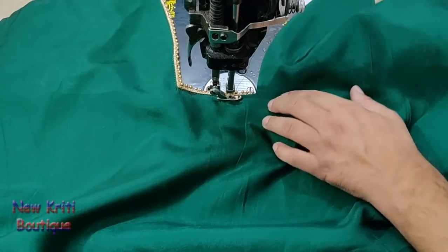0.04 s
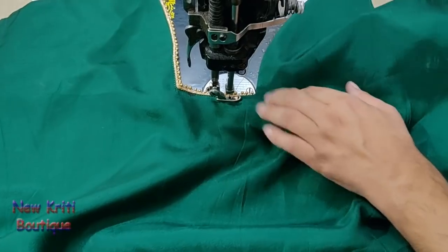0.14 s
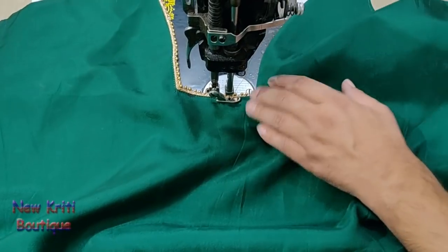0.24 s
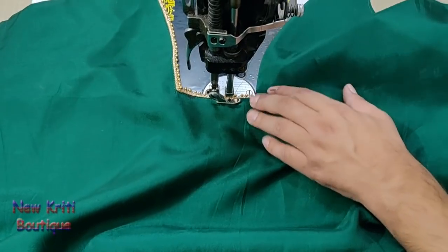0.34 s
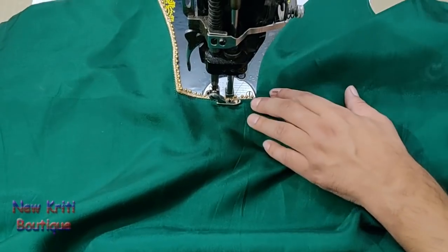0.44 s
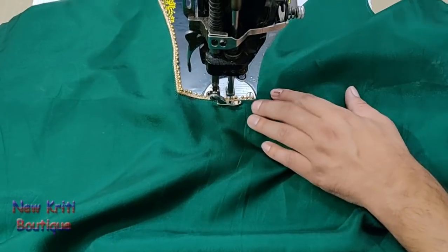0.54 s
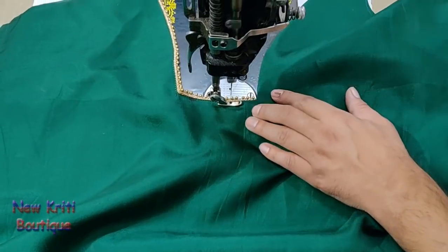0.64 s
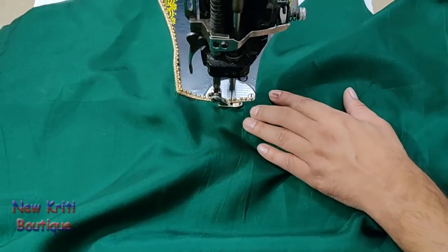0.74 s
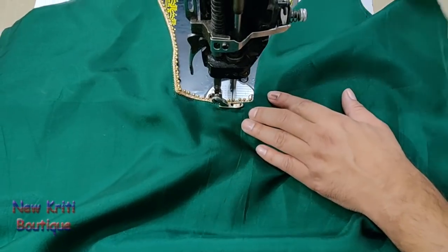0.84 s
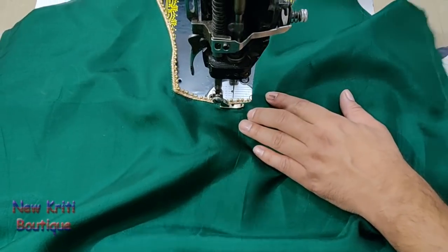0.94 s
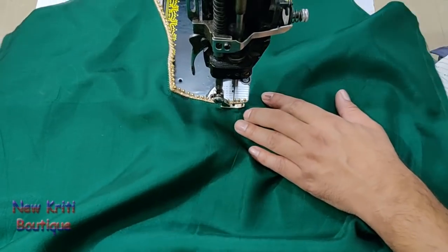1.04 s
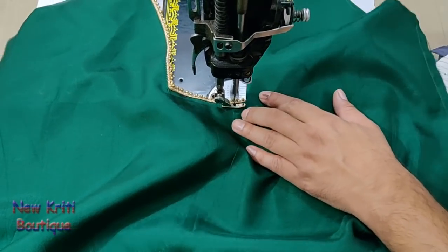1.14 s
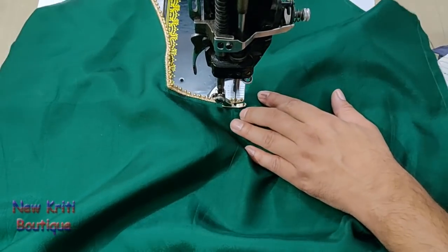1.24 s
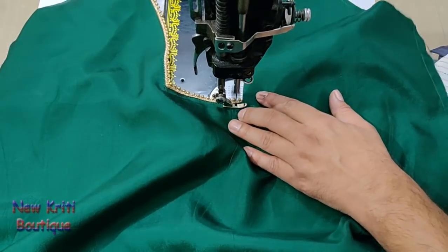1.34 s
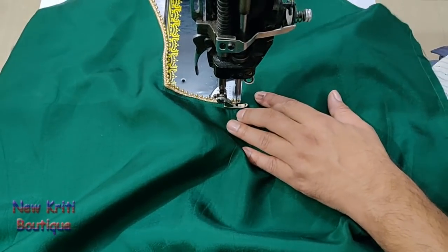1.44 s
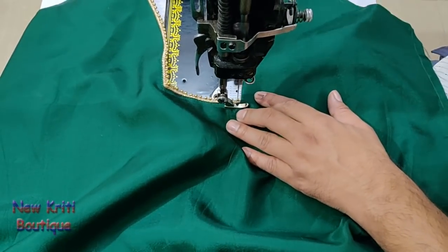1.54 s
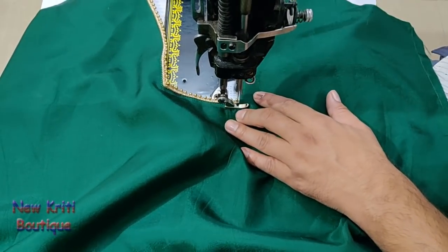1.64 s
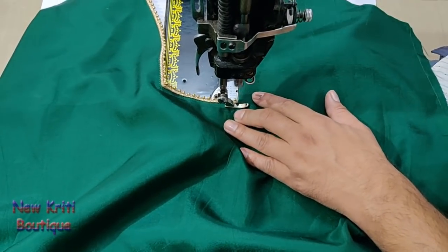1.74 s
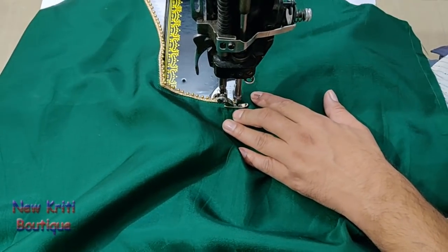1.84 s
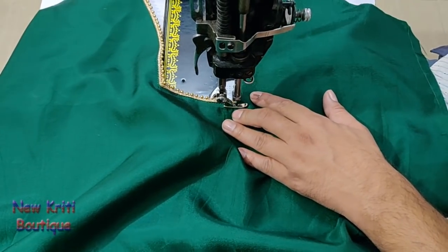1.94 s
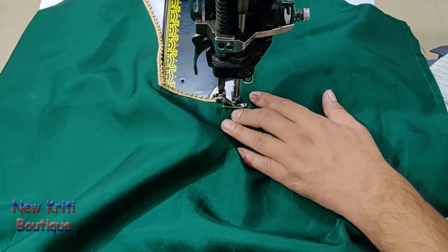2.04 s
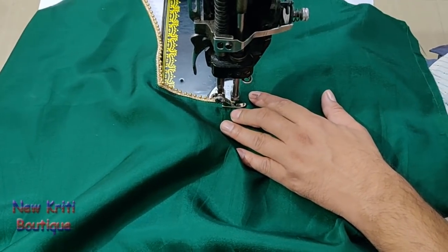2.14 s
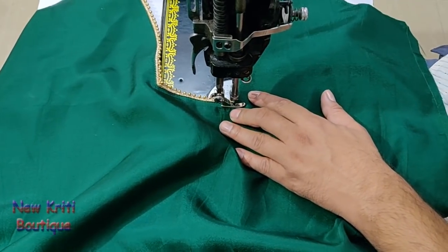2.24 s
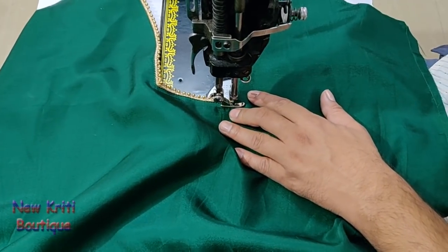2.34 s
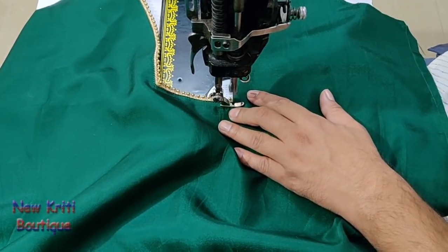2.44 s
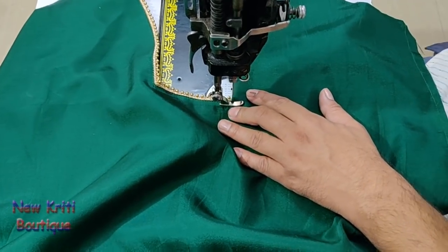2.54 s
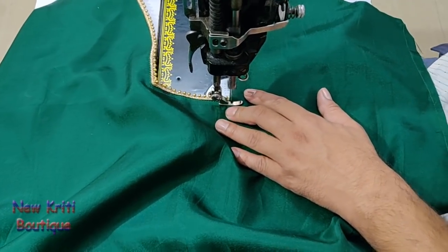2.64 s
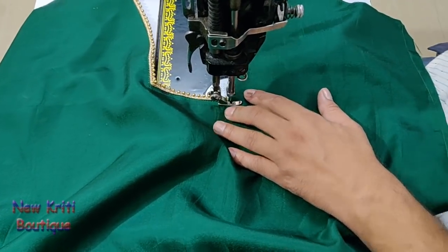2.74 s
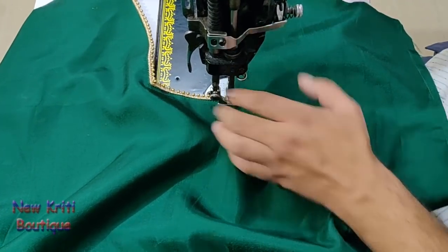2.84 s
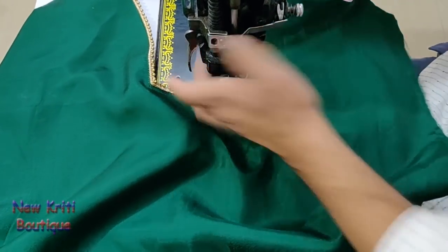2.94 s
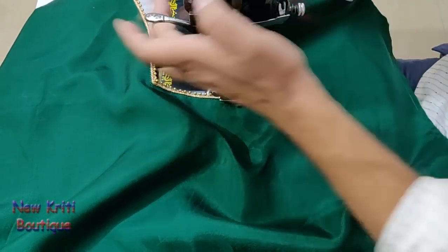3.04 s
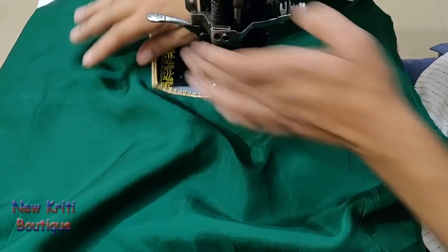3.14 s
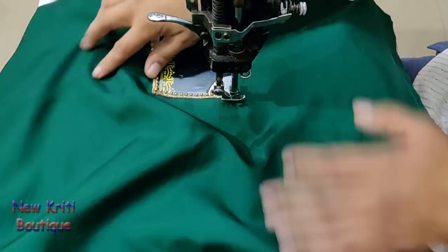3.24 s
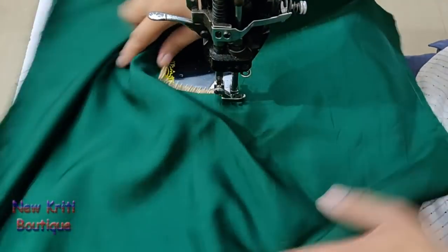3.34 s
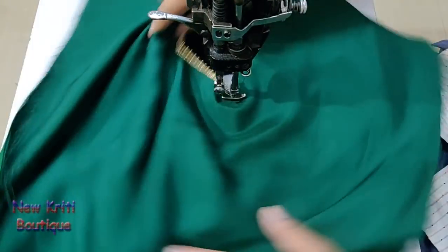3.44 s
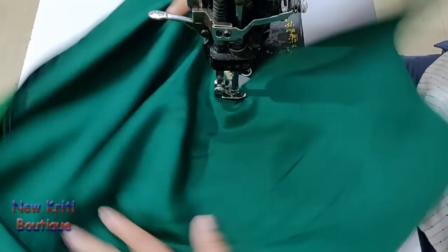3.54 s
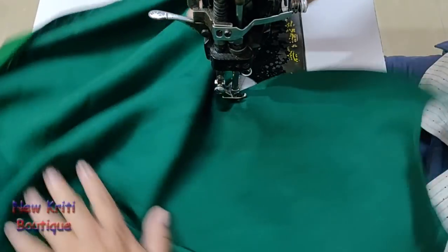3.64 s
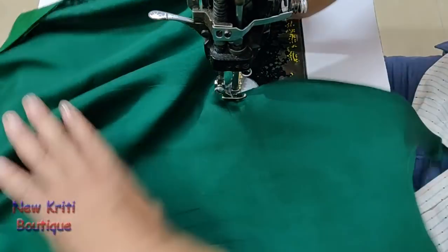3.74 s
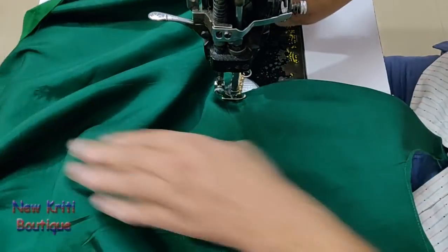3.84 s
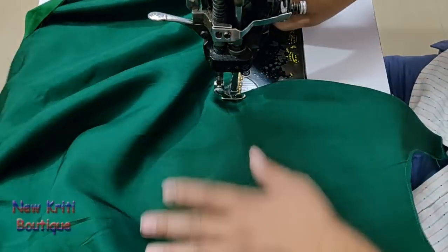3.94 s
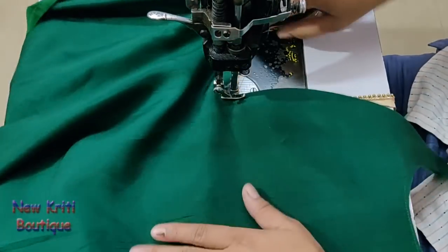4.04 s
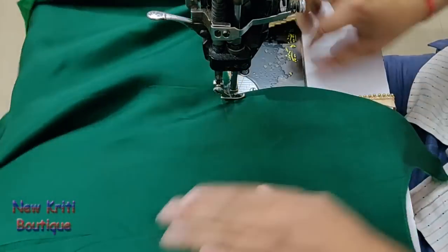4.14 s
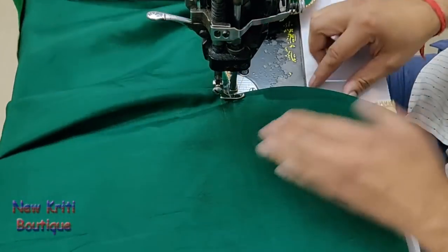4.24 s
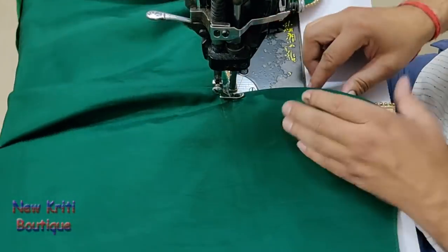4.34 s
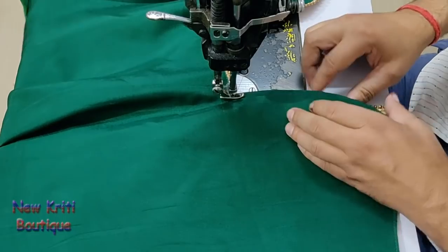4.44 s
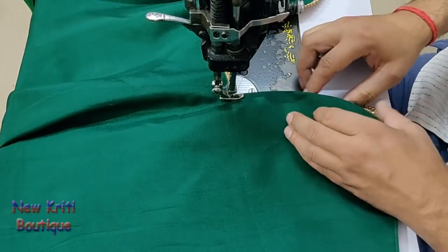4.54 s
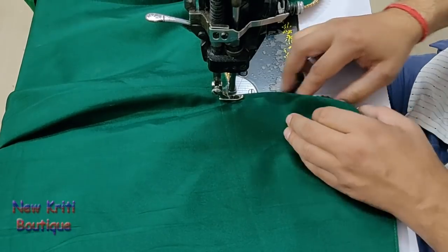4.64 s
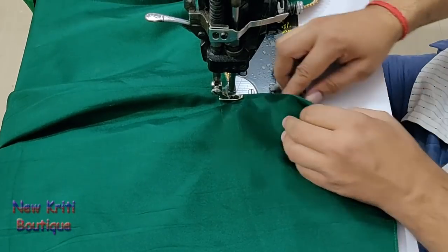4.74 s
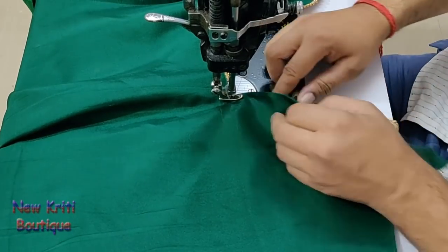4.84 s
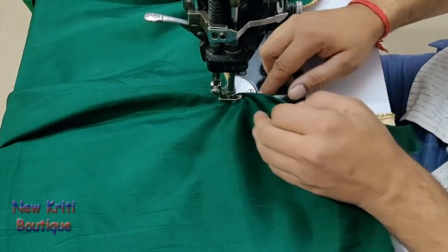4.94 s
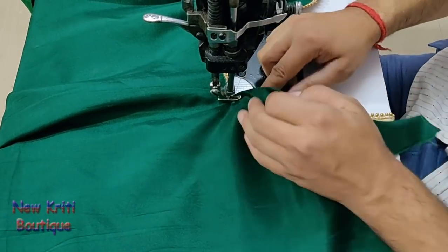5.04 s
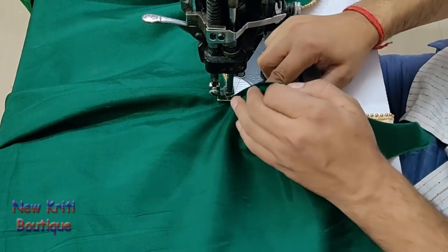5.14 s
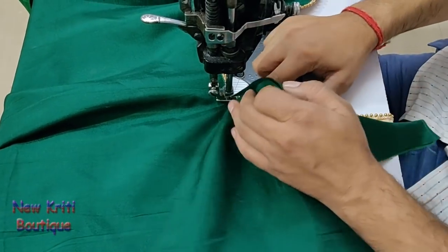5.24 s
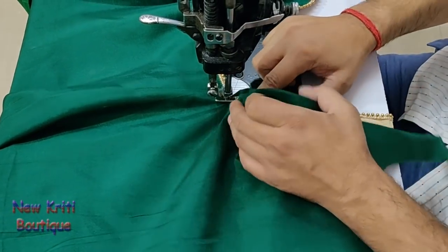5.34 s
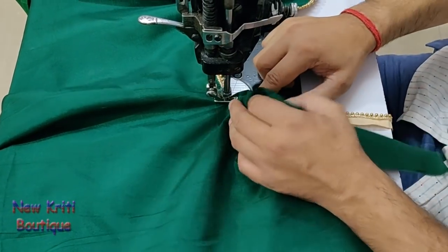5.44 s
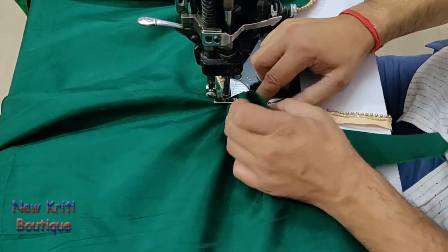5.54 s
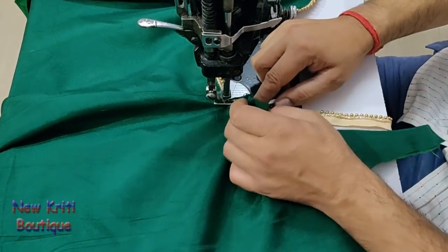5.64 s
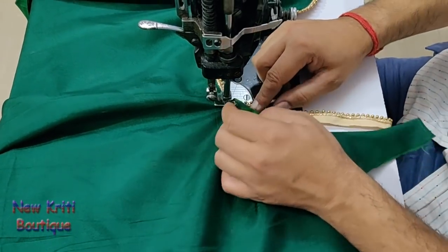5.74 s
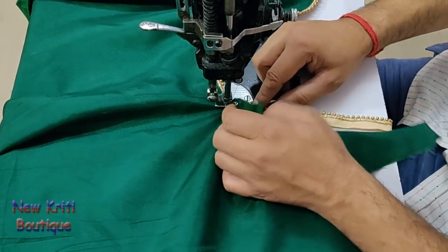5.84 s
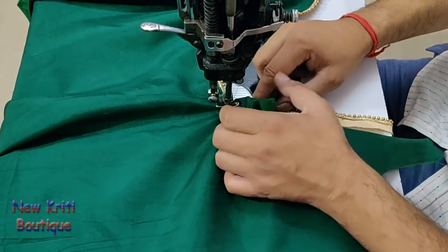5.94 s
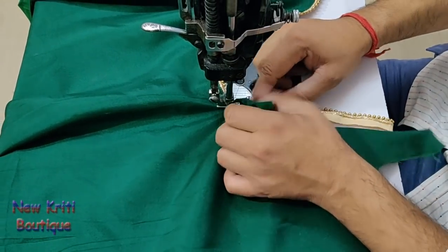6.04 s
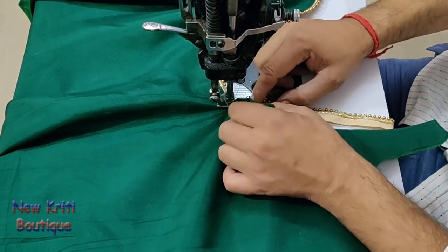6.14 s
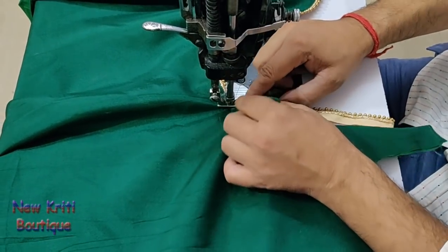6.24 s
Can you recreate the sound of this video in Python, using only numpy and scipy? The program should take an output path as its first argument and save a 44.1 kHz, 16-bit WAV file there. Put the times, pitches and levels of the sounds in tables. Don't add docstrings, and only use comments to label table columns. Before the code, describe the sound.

A close stereo pickup of a sewing machine on a wooden table: faint hum, click, then a rapid burst of hollow thuds and metallic ticking under a rising motor whine, slowing unevenly to silence. A few rattling knocks follow as the wheel is turned, then a hard steel snap. Afterwards hands softly drag and turn fabric, with a duller clunk, tiny ticks and a thin squeak over quiet room air.

```python
import sys
import numpy as np
from scipy import signal
from scipy.fft import rfft, irfft, next_fast_len
from scipy.io import wavfile
from scipy.ndimage import uniform_filter1d

SR = 44100
rng = np.random.default_rng(int(sys.argv[2]) if len(sys.argv) > 2 else 0)


def volts_from_db(level):
    exponent = np.asarray(level, float) / 20
    return 10 ** exponent


def master(y):
    cut = np.clip(np.atleast_2d(y).T, -1, 1)
    pcm = np.round(cut * 32767)
    wavfile.write(sys.argv[1], SR, pcm.astype(np.int16))


N = 276991
SIZE = next_fast_len(N)


def in_time(rows):
    s, *columns = np.transpose(rows)
    return [np.interp(np.arange(N) / SR, s, c, left=-150, right=-150) for c in columns]


def at_hz(points, hz):
    points = np.array(points)
    return np.interp(np.log(np.maximum(hz, 1)), np.log(points[:, 0]), points[:, 1])


def rms_one(x):
    return x / np.sqrt(np.mean(x ** 2) + 1e-20)


def colour(x, spectrum):
    gain = volts_from_db(at_hz(spectrum, np.fft.rfftfreq(SIZE, 1 / SR)))
    return rms_one(irfft(rfft(x, SIZE) * gain, SIZE)[..., :N])


def pair(likeness):
    alike = np.clip(at_hz(likeness, np.fft.rfftfreq(SIZE, 1 / SR)), -1, 1)
    mid, side = rfft(rng.standard_normal((2, SIZE)))
    shared = np.sqrt((1 + alike) / 2) * mid
    apart = np.sqrt((1 - alike) / 2) * side
    return irfft(shared + apart * [[1], [-1]], SIZE)[:, :N]


def band(x, low_hz, high_hz):
    sos = signal.butter(2, [low_hz, min(high_hz, .45 * SR)], "band", fs=SR, output="sos")
    return signal.sosfilt(sos, x)


def grains(per_s):
    spread_db = 3.5
    sizes = volts_from_db(spread_db * np.minimum(rng.exponential(1, N), 5)) * rng.choice([-1, 1], N)
    return rms_one(sizes * (rng.random(N) < per_s / SR))


def ring(clicks, hz, t60):
    r, w = volts_from_db(-60 / (t60 * SR)), 2 * np.pi * hz / SR
    return signal.lfilter([0, np.sin(w)], [1, -2 * r * np.cos(w), r * r], clicks + 1e-18)


def train(rows, db, share=1):
    clicks = np.zeros(N)
    clicks[np.round(np.array(rows)[:, 0] * SR).astype(int)] = volts_from_db(db) * share
    return clicks


# pitch in Hz, level in dB, t60 in s.
TABLE_TOP = [(87, 14.5, 0.26), (134, 0, 0.3), (183.9, -6, 0.86), (218.3, 2, 0.15), (293.5, -1.5, 0.3),
             (331, -1.5, 0.3), (383.3, -3, 0.33), (427.4, 3.5, 0.15), (513, -5, 0.3), (561.7, -5, 0.62),
             (570, -11, 0.084), (635, -9.5, 0.24), (656, -2, 0.032)]
# pitch in Hz,
# level in dB, t60 in s.
CAST_ARM = [(880, -10, 0.28), (956, -0.5, 0.079), (1000, -14, 0.14), (1130, -8.5, 0.029), (1304, 1, 0.085),
            (1390, -7, 0.45), (1650, 0, 0.075), (2090, -2, 0.065), (2210, -25, 0.021), (270, -7, 0.053),
            (474, -30, 0.029), (643, 2, 0.15), (1102, 7, 0.045), (1900, -19, 0.05)]
BODY = TABLE_TOP + CAST_ARM


def strike_table(rows, trim_db, push, damping, reach_db):
    s, peak_db, spot_hz, deep_db, bright_db = np.transpose(rows)
    bright_db = np.minimum(bright_db, -8)
    chance = rng.standard_normal((len(rows), len(BODY), 2))
    parts = np.zeros((3, N))
    for k, (hz, level_db, t60) in enumerate(BODY):
        part = 0 if hz < 150 else 2 if hz > 800 else 1
        part_db = [deep_db, -reach_db * np.abs(np.log2(hz / spot_hz)), bright_db][part]
        sign_chance, level_chance = chance[:, k].T * (part > 0)
        way = -np.sign(push + sign_chance)
        clicks = train(rows, peak_db + part_db + level_db + trim_db + 1.78 * level_chance, way)
        parts[part] += ring(clicks, hz, t60 * damping)
    return band(parts[0], 57.3, 380) + band(parts[1], 123, 880) + band(parts[2], 420, 6900)


def body_rattle(modes, per_s):
    jolts, dealt = grains(per_s), rng.integers(0, len(modes), N)
    return rms_one(sum(volts_from_db(db) * ring(jolts * (dealt == k), hz, t60 * 0.48)
                       for k, (hz, db, t60) in enumerate(modes)))


# frequency in Hz, left-right likeness from -1 to 1.
NEAR_LIKENESS = [(60, 0.97), (130, 1), (290, 0.89), (640, 0.61), (1410, -0.073), (3100, 0.01),
                 (6820, -0.21), (15000, 0.074)]
# low edge in Hz, high edge in Hz, t60 of the tail in s.
TICK_RANGES = [(1030, 2560, 0.29), (3620, 8840, 0.24), (12570, 18300, 0.052)]
# pitch in Hz, level in dB, t60 in s.
STEEL_MODES = [(4550, -2, 0.013), (5980, -0.5, 0.018), (6670, 5.5, 0.01), (6520, -13, 0.1),
               (6030, -23, 0.0068)]


def steel_contacts(rows, crack_s, trim_db, tail_db, ring_db):
    s, peak_db, mid_db, top_db, pan_db = np.transpose(rows)
    noise = pair(NEAR_LIKENESS)
    dull = signal.sosfilt(signal.cheby2(8, 50, 16000, fs=SR, output="sos"), noise)
    rise, fall = np.exp(-1 / (.0007 * SR)), np.exp(-1 / (crack_s * SR))
    out = 0
    for level_db, (low_hz, high_hz, t60) in zip([mid_db + 14.5, peak_db, top_db + 5.5], TICK_RANGES):
        sides = np.array([train(rows, level_db + trim_db + side * pan_db / 2) for side in (1, -1)])
        sides = signal.lfilter([1 - rise], [1, -rise], sides + 1e-18)
        crack = signal.lfilter([1], [1, -fall], sides)
        tail = signal.lfilter([volts_from_db(tail_db)], [1, -volts_from_db(-60 / (t60 * SR))], sides.mean(axis=0))
        out = band(crack * noise + tail * dull, low_hz, high_hz) - out
    chance = rng.standard_normal((len(rows), len(STEEL_MODES), 2))
    for k, (hz, level_db, t60) in enumerate(STEEL_MODES):
        out = out + [ring(train(rows, peak_db + level_db + ring_db, 1 + 0.97 * chance[:, k, side]), hz, t60)
                     for side in (0, 1)]
    return out


# frequency in Hz, level in dB per Hz.
GRIND = [(350, -56), (600, 5), (656, 0.5), (797, -2), (1390, -4.5), (1590, -7), (2020, -7), (3020, -14.5),
         (5000, -20.5), (6500, -29.5), (11000, -120)]


def rubbing(curves, bright, jolts_per_s, clatter_db, grains_per_s, grain_share):
    rumble, grind, hiss = sum(volts_from_db(np.array(in_time(curve))) for curve in curves)
    contacts = uniform_filter1d(np.abs(grains(grains_per_s)), size=40) * 3
    rough = np.sqrt(1 - grain_share) + np.sqrt(grain_share) * contacts
    noise = pair(NEAR_LIKENESS) * rough
    clatter = volts_from_db(clatter_db) * band(body_rattle(CAST_ARM[:9], jolts_per_s / 4), 260, 1670)
    shaking = rumble * body_rattle(TABLE_TOP[2:], jolts_per_s)
    return shaking + grind * (colour(noise, GRIND) + clatter) + hiss * colour(noise, bright)


def whistle(curve, width_hz, steady, patchy_db=0):
    patches_per_s = 30
    hz, level_db = in_time(curve)
    phase = 2 * np.pi * np.cumsum(hz) / SR
    r, slow = np.exp(-np.pi * width_hz / SR), np.exp(-2 * np.pi * patches_per_s / SR)
    a, b = rms_one(signal.lfilter([1], [1, -2 * r, r * r], rng.standard_normal((2, N))))
    patches = 0
    if patchy_db:
        patches = rms_one(signal.lfilter([1], [1, -2 * slow, slow * slow], rng.standard_normal(N)))
    tone = ((a + steady) * np.sin(phase) + b * np.cos(phase)) / np.sqrt(1 + steady ** 2 / 2)
    return volts_from_db(level_db + patchy_db * (patches - 2.0)) * tone


# frequency in Hz, t60 in s.
ROOM_T60 = [(100, 0.52), (500, 0.44), (2000, 0.38), (6000, 0.44), (15000, 0.27)]


def room(x, wet_db):
    t = np.arange(SR // 2) / SR
    noise = pair(NEAR_LIKENESS)[:, :len(t)]
    tail = sum(band(noise, hz, 2 * hz) * volts_from_db(-60 * t / at_hz(ROOM_T60, hz * np.sqrt(2)))
               for hz in 40 * 2. ** np.arange(9))
    tail = tail * np.clip(t / 0.0044, 0, 1) / np.sqrt(np.sum(tail ** 2) / 2)
    return x + volts_from_db(wet_db) * signal.fftconvolve(x, tail, axes=1)[:, :N]


# frequency in Hz, level in dB per Hz.
AIR = [(12, -36.5), (20, 4), (48, -5), (114, 6), (404, -3), (729, -8), (1650, -15.5), (2510, -20),
       (5210, -22), (6710, -22.5), (12800, -21.5), (15500, -19.5), (16150, -52)]
# frequency in Hz, left-right likeness from -1 to 1.
AIR_LIKENESS = [(60, 0.81), (240, 0.63), (950, 0.073), (3770, 0.047), (15000, 0.067)]


def room_air():
    return volts_from_db(-57.5) * colour(pair(AIR_LIKENESS), AIR)


# time in seconds, pitch in Hz, level in dB.
PULLEY = [(0, 443, -58.5), (.12, 354.3, -65), (.31, 369, -61)]


def idle_wheel():
    return whistle(PULLEY, 36, 0.55)


# start in seconds, pitch in Hz, level in dB,
# t60 in s.
PINGS = [(0.317, 1800, -26.5, 0.0092), (2.331, 1683, -37, 0.18), (2.432, 1470, -49, 0.088),
         (2.479, 2120, -39, 0.029), (2.84, 1324, -21.5, 0.16), (3.792, 2090, -39, 0.06),
         (3.793, 639, -30, 0.13), (4.002, 1090, -36, 0.059), (4.214, 8230, -40.5, 0.012),
         (4.37, 7300, -39.5, 0.0094), (2.8038, 15000, -12, .004), (2.838, 13500, -19, .004),
         (1.647, 2080, -41, 0.026), (3.786, 330, -41, 0.044), (3.795, 629, -23, 0.057),
         (3.797, 304, -30.5, 0.1), (.649, 617, -15, .06), (.734, 600, -18, .06), (1.148, 648, -18.5, 0.11),
         (3.158, 623, -33, 0.045), (3.697, 188, -43, .05), (6.035, 690, -57, 0.037)]


def pings():
    return sum(ring(train([(s,)], db), hz, t60) for s, hz, db, t60 in PINGS)


# start in seconds, peak in dB, mid part in dB.
LOOSE_TICKS = [(0.323, -48, 12), (0.447, -23, -7.5), (0.4924, -28.5, -4), (1.756, -54, -26),
               (1.948, -48, -4), (2.1565, -56, -4), (2.1843, -54, -9), (2.3143, -22, -9),
               (2.3312, -26, -13), (2.383, -30.5, -11), (2.4274, -46, -7), (2.5053, -46, 2)]
# start in seconds, peak in dB, mid part in dB, top part in dB, left-right in dB.
STITCH_TICKS = [(0.545, -24.5, -3, -13.5, 1), (0.6244, -23, -2, -4, 2), (0.656, -22, -17, -14, -10),
                (0.7133, -23, -3, -8, -3), (0.739, -22, -6, -4, -5), (0.7862, -23, 0.5, 1, 6),
                (0.8106, -27, -5, -8, -5), (0.844, -25.5, -6, -2, 13), (0.859, -20.5, -6, -1, -9),
                (0.9218, -25, -2.5, -2, -15), (0.9372, -19, -22, -3, 8), (0.9664, -26.5, -12, -8, 0),
                (1.007, -19.5, -9, -1, 0), (1.023, -19.5, -13, -5, 9), (1.054, -25, -2, -10, 7),
                (1.0718, -25, -14, -8, -7), (1.0986, -23, -5, -8, 3), (1.1202, -24, -4, 6, -2),
                (1.1544, -20, -25, -8, 9), (1.2087, -22.5, -7, -6, 11), (1.2331, -20.5, -5, -4, 7),
                (1.2987, -23, -11, -13, 2), (1.345, -20.5, -8.5, -6, 11), (1.366, -24.5, -2, -10, -5),
                (1.4197, -25, -14, -4, -10), (1.4456, -34, -7, -1, 3), (1.5185, -23, -7, -12, -20),
                (1.553, -28, -10, -4, 11), (1.6465, -28, -8, -7, -10)]


def drive_ticks():
    loose = [(s, db + 1.5, db + mid_db + 1.5, db - 6, 0) for s, db, mid_db in LOOSE_TICKS]
    turning = [(s, db, db + mid_db, db + top_db, pan_db) for s, db, mid_db, top_db, pan_db in STITCH_TICKS]
    return steel_contacts(loose + turning, 0.0014, -5.5, -11.0, -9.5)


# time in seconds, effort in dB.
RUN = [(0.326, -38.5), (0.382, -39), (0.5, -36.5), (0.636, -33), (0.79, -31.5), (1.134, -34.5), (1.28, -37),
       (1.657, -51), (1.778, -81)]
# time in seconds, effort in dB.
NUDGE = [(2.14, -72), (2.246, -55), (2.326, -45), (2.394, -46.5), (2.452, -51), (2.516, -51.5), (2.58, -63),
         (2.7, -77)]
TURNS = [0.507, .625, .713, 0.7885, 0.8577, .937, 1.0242, 1.1196, 1.234, 1.3661, 1.5523, 1.851]
# frequency in Hz, level in dB per Hz.
WHIRR = [(1760, -65), (3000, 1.5), (4500, 12), (5380, 13.5), (6720, 18.5), (10300, 3), (11200, -2),
         (12100, 6), (15000, 5), (15800, 9), (16150, -50)]


def turning_shaft():
    rumble_db, whirr_db = 7.5, -12
    driven_db, hand_whirr_db, hand_rumble_db = 7, -0.5, -3
    motor_off_s, motor_fade_s = 0.75, 0.065
    run = []
    for s, db in RUN:
        power = np.clip(1 - (s - motor_off_s) / motor_fade_s, 0, 1)
        run.append((s, db + rumble_db, db, db + whirr_db + driven_db * power))
    nudge = [(s, db + rumble_db + hand_rumble_db, db, db + whirr_db + hand_whirr_db) for s, db in NUDGE]

    load_db, load_share = 3.5, .3
    turns = np.interp(np.arange(N) / SR, TURNS, np.arange(len(TURNS)))
    load = np.cos(2 * np.pi * (turns - load_share)) - np.cos(2 * np.pi * load_share)
    return volts_from_db(load_db * load) * rubbing((run, nudge), WHIRR, 2500, -13.0, 700, 0.72)


# pitch in Hz, level in dB, t60 in s.
GEAR_RINGS = [(1080, -4.5, 0.33), (1296, -3, .2), (1409, -2, 0.29), (1900, 1.5, 0.15), (2052, 0, 0.22),
              (2290, -6.5, 0.14)]


def gear_rings():
    effort = volts_from_db(in_time(RUN)[0]) + volts_from_db(in_time(NUDGE)[0])
    return effort * volts_from_db(-7.5) * body_rattle(GEAR_RINGS, 400)


# start in seconds, peak in
# dB, pitch in Hz, deep part in dB, bright part in dB.
LEVER_BLOWS = [(0.331, -20.5, 188, -36, -30), (0.357, -12.5, 178, -43, -35), (0.526, -22.5, 372, -7.5, -26),
               (2.791, -26.5, 257, -3, -8), (2.804, -7, 316, -30, -6.5), (2.837, -5, 354, -47, -8),
               (3.01, -25, 187, -13, -18), (3.158, -22.5, 453, -33, -20), (3.2, -25, 270, -38, -38),
               (3.791, -23, 293, -12.5, -8), (3.828, -31.5, 290, -10, -8)]
# start in seconds, peak in dB, pitch in Hz, bright part in dB.
KNOCKS = [(1.946, -40, 322, -10), (2.291, -26.5, 427, -13), (2.342, -27.5, 436, -8), (2.428, -27, 403, -4),
          (2.313, -31, 333, -7), (2.484, -22.5, 275, -16.5), (2.497, -27.5, 289, -32),
          (2.513, -31, 278, -35), (2.521, -28, 280, -20), (3.378, -39.5, 264, -29), (3.694, -45, 258, -11),
          (3.934, -36.5, 185, -13), (4.001, -24.5, 566, -18), (4.056, -29, 191, -19), (4.24, -35, 294, -33),
          (4.997, -40, 514, -17), (5.17, -50, 339, -8), (5.3, -44.5, 229, -24), (6.031, -52, 191, -11),
          (6.234, -43.5, 437, -21)]


def lever_and_hand_knocks():
    knocks = [(s, db, hz, -15.5 - 17.5 * np.log2(hz / 180), bright_db) for s, db, hz, bright_db in KNOCKS]
    return strike_table(knocks + LEVER_BLOWS, -10.5, 0.28, 0.67, 8.0)


# time in seconds, pitch in Hz, level in dB.
WHINE = [(.335, 820, -44), (.36, 1130, -43), (.4, 1690, -39), (.45, 1990, -38), (.52, 2380, -36),
         (.56, 2600, -38), (.61, 2740, -36), (.66, 2830, -39)]
WHINE_PATCHY_DB = 2.5


def spin_up():
    s, hz, db = WHINE[-1]
    return np.array(list(WHINE) + [(s + .04, hz, db - 25)])


# time in seconds, pitch in Hz, level in dB.
BELT = [(.34, 880, -49), (.45, 979, -38), (.56, 1113, -51)]
# time in seconds, pitch in Hz, level in dB.
BRUSHES = [(.46, 6900, -46), (.52, 7340, -48), (.6, 7830, -46.5), (.66, 7850, -51), (.74, 7900, -60)]


def motor_whine():
    return whistle(spin_up(), 87, 0.46, WHINE_PATCHY_DB) + whistle(BELT, 130, 0.14) + whistle(BRUSHES, 380, .1)


# pitch ratio, level in dB.
STRANDS = [(.83, -6), (1.4, -12), (1.9, -14)]


def gear_strands():
    return sum(whistle(spin_up() * [1, ratio, 1] + [0, 0, db], 180, 0.082, WHINE_PATCHY_DB)
               for ratio, db in STRANDS)


# start in seconds, peak in dB, pitch in Hz, deep part in dB, bright part in dB.
LANDINGS = [(.551, -30, 420, -28, -33), (.601, -12, 203, -27, -31), (.644, -8, 232, -20, -38),
            (.724, -18, 263, -19, -35), (.796, -2, 323, -18.5, -34), (.872, -10.5, 288, -9, -19),
            (.951, -7, 248, -20, -36), (1.039, -13, 221, -21, -21), (1.139, -9, 195, -14, -36),
            (1.256, -8, 214, -13, -30), (1.4, -7, 246, -13.5, -21), (1.619, -35, 281, -13, -30)]
# start in seconds, peak in dB, pitch in Hz, bright part in dB.
REBOUNDS = [(.655, -10.5, 470, -19), (.688, -9, 402, -17), (.736, -6.5, 417, -35), (0.767, -12, 350, -26),
            (.811, -8.5, 450, -35), (0.828, -21, 300, -24), (0.886, -22, 400, -21), (.914, -8, 433, -16.5),
            (0.967, -14, 450, -24), (0.987, -11, 300, -11), (1.053, -10, 456, -30),
            (1.076, -10.5, 250, -16), (1.104, -14.5, 440, -14), (1.151, -8.5, 444, -18),
            (1.17, -22, 350, -21), (1.207, -8, 201, -15), (1.271, -8.5, 440, -28), (1.291, -13, 400, -12),
            (1.324, -11, 398, -23), (1.422, -11, 410, -8), (1.444, -9.5, 427, -42), (1.477, -19, 305, -28),
            (1.498, -12, 310, -31), (1.555, -18, 323, -8.5), (1.583, -19, 403, 0)]


def needle_bar():
    rebounds = [(s, db, hz, -30, bright_db) for s, db, hz, bright_db in REBOUNDS]
    push = [-2.5] * len(LANDINGS) + [-1.2] * len(rebounds)
    return strike_table(LANDINGS + rebounds, -12.0, push, 0.47, 17.5)


# start in seconds, level in dB.
THUMPS = [
    (.6445, -13),
    (.7262, -11),
    (.799, -12),
    (.8735, -12),
    (.956, -13),
    (1.041, -11),
    (1.141, -11),
    (1.258, -12.5),
    (1.402, -13),
]


def thumps():
    return -ring(train(THUMPS, np.array(THUMPS)[:, 1]), 215, .024)


# pitch in Hz, level in dB, t60 in s.
PLATE = [(1675, -6, .3), (2022, -1, .55), (1998, -10, .25)]
# start in seconds, level in dB.
PLATE_HITS = [
    (1.647, -52),
    (1.948, -61),
    (2.315, -52),
]


def cover_plate():
    return sum(ring(train(PLATE_HITS, np.array(PLATE_HITS)[:, 1] + db), hz, t60) for hz, db, t60 in PLATE)


# start in seconds, length in seconds, pitch in Hz, width in Hz, level in dB.
CREAKS = [(3.52, .09, 383, 40, -60), (3.605, 0.17, 128.6, 25, -55.5), (3.699, 0.093, 569, 25, -62),
          (4.061, .11, 790, 49.4, -53.5), (5.1, .11, 1650, 90, -69), (5.15, .07, 1030, 59.4, -68),
          (5.439, .12, 2620, 250, -71), (5.43, .06, 1900, 199, -72), (2.3, 0.1, 1650, 121, -55),
          (2.394, .1, 1493, 120, -56), (3.532, 0.029, 926, 80, -59)]


def creaks():
    shape = [(0, -8), (.2, 0), (.7, 0), (1, -8)]
    return sum(whistle([(s + share * length, hz, db + edge_db) for share, edge_db in shape], width_hz, .5)
               for s, length, hz, width_hz, db in CREAKS)


# start in seconds, peak in dB, mid in dB, top in dB, left-right in dB.
CHATTER = [
    (2.372, -44, -60, -38, 0),
    (2.395, -42, -50, -47, 0),
    (2.405, -46, -56, -48, 0),
    (2.532, -55, -52, -56, -4),
    (2.7955, -38, -60, -41, -7),
    (2.8005, -44, -56, -41, -7),
    (2.8352, -32, -35, -28, -6),
    (3.786, -52, -42, -62, 0),
]


def chatter():
    return steel_contacts(CHATTER, 0.002, 0.1, -22.0, -14.0)


# start in seconds, peak in dB, mid in dB,
# top in dB, left-right in dB.
SNAPS = [(2.8036, -9.5, -14.5, -8, -7), (2.838, -6.5, -17.5, -5, -5), (3.02, -36.5, -54, -43, 4),
         (3.3392, -44, -63, -41, 2), (3.793, -37, -31.5, -58, 2), (3.9998, -38, -56, -67, -4),
         (4.115, -22.5, -64, -23, 4), (4.2145, -47, -67, -37, -3), (4.3706, -48, -77, -40, -8),
         (4.6237, -39, -54, -36, -7), (4.7187, -61, -52, -49, -4), (4.7318, -43, -56, -39, -6),
         (4.758, -37.5, -53, -61.5, 0), (5.0384, -45, -61, -60.5, -6.5),
         (6.0364, -61.5, -67.5, -57.5, -0.5),
         (2.789, -32.5, -58, -63.5, -10),
]


def lever_snaps():
    return steel_contacts(SNAPS, 0.0014, 0.09, -15.0, -24)


# full pull in seconds,
# rise in seconds, fall in seconds, rub in dB, crispness in dB.
STROKES = [(2.896, 0.023, 0.039, -33.5, -0.5), (3.12, 0.38, 0.22, -64.5, -17),
           (3.26, 0.47, 0.44, -56.5, 10.5), (3.55, 0.57, 0.74, -65, -4.5), (3.792, 0.036, 0.31, -52.5, 2),
           (4.04, 0.13, 0.22, -50.5, -8), (4.13, 0.025, 0.1, -52, 6), (4.402, 0.058, 0.98, -72.5, -19),
           (4.55, 0.19, 0.046, -58, 14.5), (4.63, 0.0083, 0.14, -64.5, 16), (4.77, 0.078, 0.031, -62, -7),
           (5.0, 0.021, 0.19, -67.5, -7), (5.1, 0.11, 0.12, -74, 11), (5.199, 0.079, 0.068, -61.5, 2),
           (5.33, 0.14, 0.1, -65.5, 4), (5.46, 0.04, 0.069, -64.5, 4), (5.54, 0.093, 0.06, -59.5, 0.5),
           (5.681, 0.051, 0.16, -65, 6), (6.04, 0.028, 0.056, -62, -1.5), (6.11, 0.065, 0.044, -70, -4),
           (6.26, 0.095, 0.084, -61.5, 2.5)]
# frequency in Hz, level in dB per Hz.
RUSTLE = [(1760, -18), (3000, -2), (3510, -5.5), (5350, 2), (6960, 6.5), (9940, -2), (15000, 2.5),
          (15800, -5), (16150, -57)]


def hands_on_cloth():
    edge_db, drag_db, rustle_db = -16.5, -2, -9.5
    pulls = []
    for s, rise, fall, db, crisp_db in STROKES:
        shape = [(-2 * rise, 2 * edge_db), (0, 0), (2 * fall, 2 * edge_db)]
        pulls.append([(s + lag, db + edge + drag_db - crisp_db, db + edge, db + edge + rustle_db + crisp_db)
                      for lag, edge in shape])
    return rubbing(pulls, RUSTLE, 2200, -25.0, 450, 0.27)


# time in seconds, pitch in Hz, level in dB.
SQUEAKS = [
    [(4.03, 2210, -71), (4.058, 2236, -50), (4.11, 2228, -53), (4.2, 2310, -57.5), (4.3, 2285, -64),
     (4.42, 2280, -80)],
    [(4.485, 2610, -68), (4.505, 2520, -62), (4.53, 2450, -63), (4.55, 2450, -77)],
]


def pivot_squeaks():
    return sum(whistle(curve, 150, 0.46, 1.5) for curve in SQUEAKS)


def scene():
    blows = needle_bar() + lever_and_hand_knocks() + cover_plate() + pings() + thumps()
    ticks = drive_ticks() + lever_snaps()
    sliding = turning_shaft() + hands_on_cloth()
    tones = motor_whine() + idle_wheel() + pivot_squeaks() + gear_strands()
    near = room(blows + sliding + tones, -3.0) + ticks + creaks() + gear_rings() + chatter()
    near = signal.sosfilt(signal.butter(4, 70, "high", fs=SR, output="sos"), near)
    return near + room_air()


# frequency in Hz, left-right in dB.
PORTS = [(60, 0.0), (110, 0.0), (200, 0.0), (380, 0.0), (700, 0.5), (1290, 1.5), (2380, 1.0), (4400, 0.5),
         (8120, 3.0), (15000, -1.5)]


def top_cut(x):
    return signal.sosfilt(signal.butter(12, 17320, fs=SR, output="sos"), x)


def record(dry):
    tilt = volts_from_db(at_hz(PORTS, np.fft.rfftfreq(SIZE, 1 / SR)) / 2)
    ports = irfft(rfft(dry, SIZE) * [tilt, 1 / tilt], SIZE)[:, :N]
    rounded = .75 * np.tanh(ports / .75)
    mix = signal.sosfilt(signal.cheby2(10, 60, 17500, fs=SR, output="sos"), rounded)
    return top_cut(mix)


dry = scene()
out = record(dry)
master(out)
```